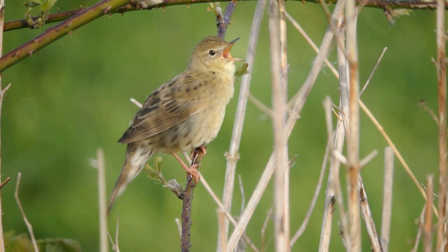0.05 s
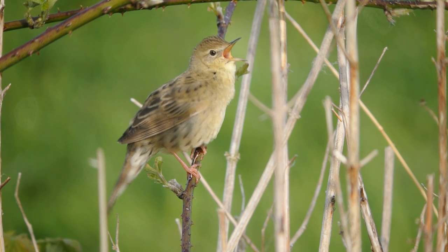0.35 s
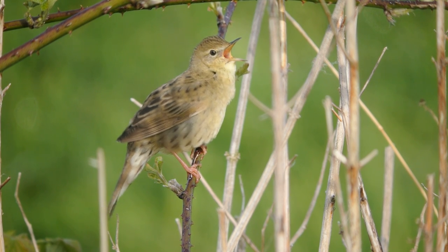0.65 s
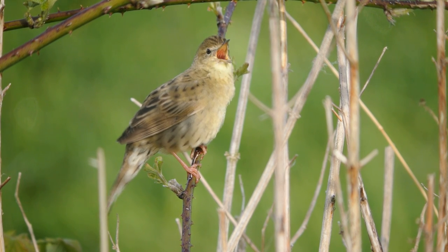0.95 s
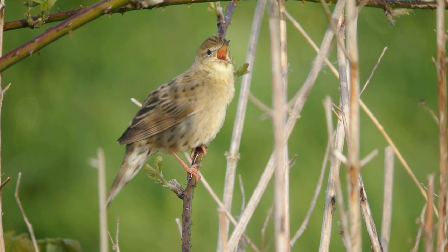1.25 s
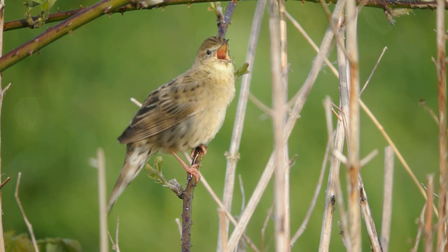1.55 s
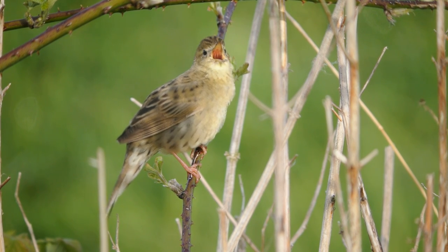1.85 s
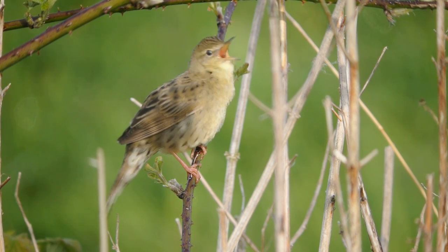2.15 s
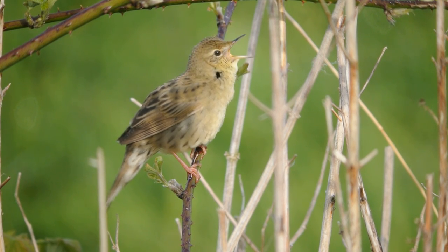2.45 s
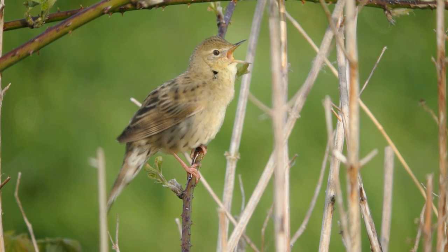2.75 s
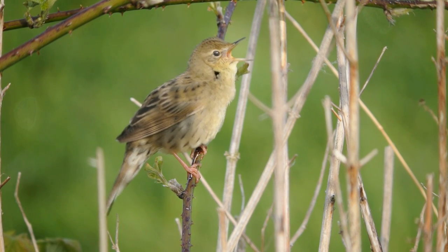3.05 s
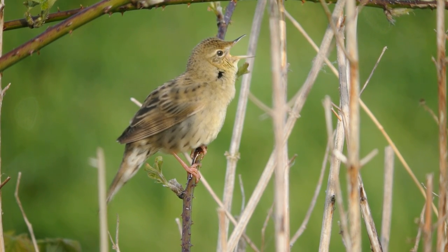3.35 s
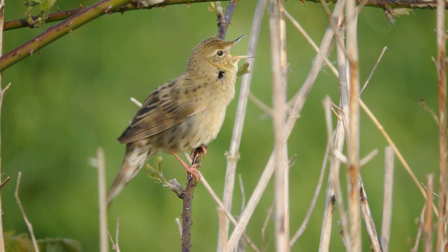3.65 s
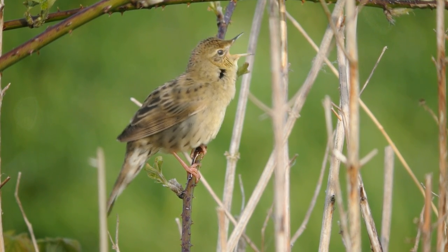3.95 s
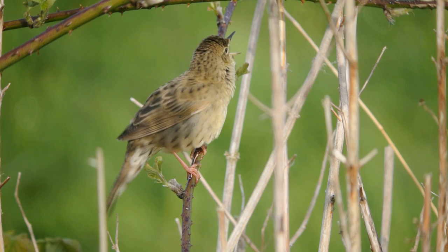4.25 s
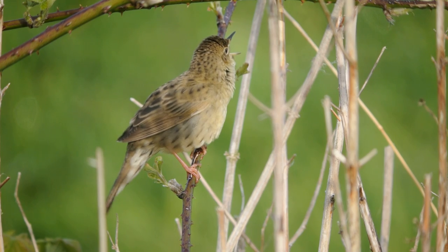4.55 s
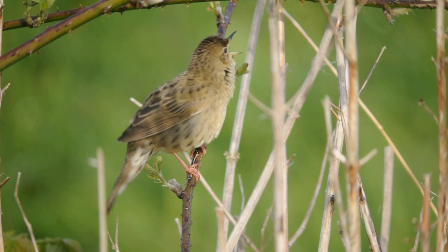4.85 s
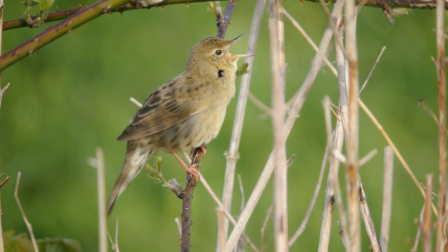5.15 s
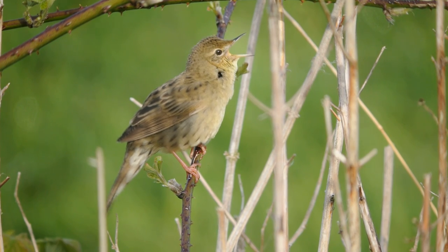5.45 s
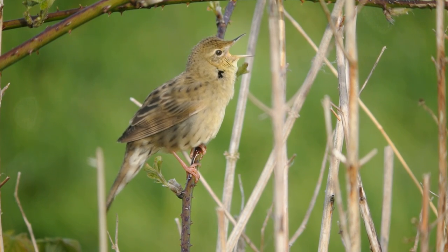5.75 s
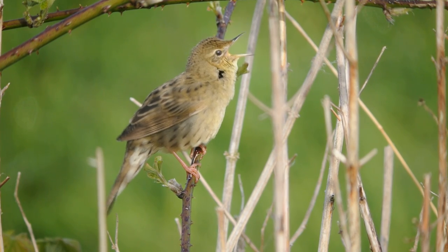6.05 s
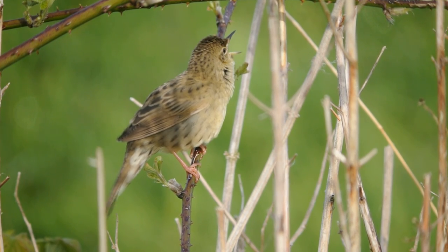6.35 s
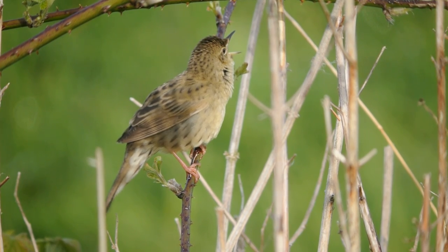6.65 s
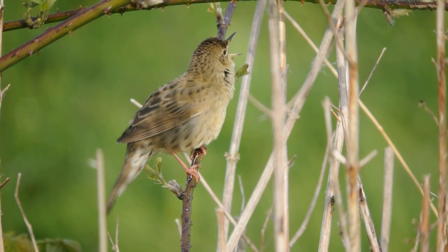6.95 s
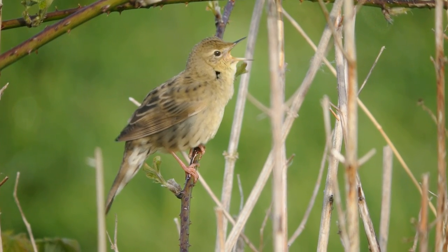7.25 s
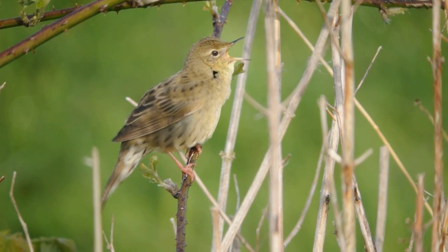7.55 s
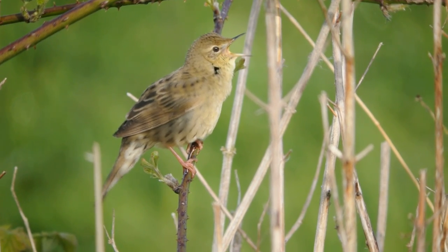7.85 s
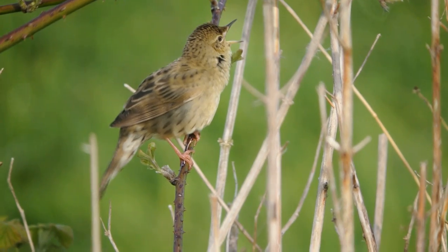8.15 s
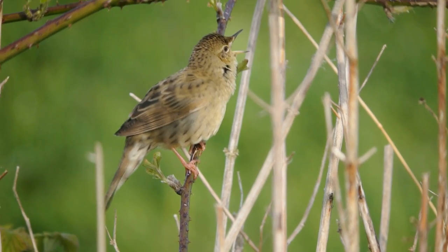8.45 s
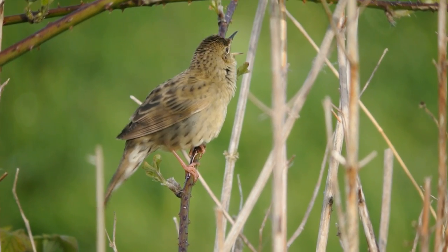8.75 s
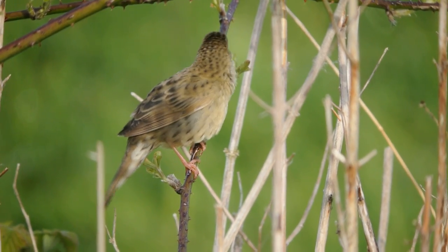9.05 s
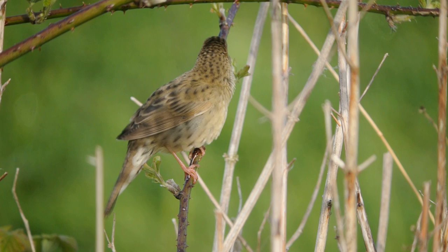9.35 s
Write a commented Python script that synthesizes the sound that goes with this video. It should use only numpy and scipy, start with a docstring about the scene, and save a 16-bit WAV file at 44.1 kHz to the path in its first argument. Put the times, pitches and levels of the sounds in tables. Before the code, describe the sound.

A warbler's fast, unbroken ticking trill rings out outdoors over a faint reed rustle, soft wind and occasional crackles of dry stems.

```python
"""A warbler reels in a reed bed: about 26 times a second a sharp upswept tick, then a short lower note.
Each is a gliding whistle with a weak octave; the song is beamed, so it fades as the head turns away,
and the stems scatter it. Dry stems rasp by friction and snap free, soft bumps sound close by and other
birds call far off. Eddies of wind buffet the left microphone port over a rustle and a distant rumble."""
import sys
import numpy as np
from scipy import signal
from scipy.fft import rfft, irfft, next_fast_len
from scipy.io import wavfile
from scipy.ndimage import map_coordinates

SR = 44100
rng = np.random.default_rng(int(sys.argv[2]) if len(sys.argv) > 2 else 0)


def pcm_store(signal):
    """Save signal as 16-bit PCM."""
    levels = np.round(np.clip(np.atleast_2d(signal), -1, 1) * 32767)
    wavfile.write(sys.argv[1], SR, levels.astype(np.int16).T)


N = 418509

# How the song carries as the head moves. Each row: time in seconds, relative level in dB.
SONG_LEVEL = [(0, -12.5), (1.2, -10.5), (1.85, -12), (2.3, -12.5), (3.05, -12.5), (3.6, -14.5), (4.35, -16),
              (4.85, -15.5), (5.1, -12.5), (5.25, -14), (5.5, -13.5), (5.75, -15.5), (5.92, -17.5),
              (6.2, -19.5), (6.4, -17.5), (7.2, -16.5), (7.35, -13.5), (7.85, -13.5), (8.03, -11.5),
              (8.14, -14), (9, -15), (9.15, -12), (9.49, -13)]
# The spectrum of low buffeting. Each row: frequency in Hz, relative level in dB.
BUFFET_SPECTRUM = [(20, -38), (60, -30), (130, 0.5), (230, 2), (330, -4), (500, -13.5), (700, -30),
                   (1000, -40), (1600, -110)]


def amp(db):
    """Decibels to amplitude ratio."""
    return np.exp(np.asarray(db) * (np.log(10) / 20))


def unit(x):
    """Normalisation to rms 1."""
    return x / np.sqrt(np.mean(x ** 2) + 1e-20)


def along(points, hz):
    """Interpolation of (Hz, value) points on a logarithmic frequency axis."""
    freqs, values = np.transpose(points)
    return np.interp(np.log(hz + 1), np.log(freqs + 1), values)


def read(rows, at):
    """Linear interpolation of each later column at given values of the first."""
    first, *columns = np.transpose(rows)
    return [np.interp(at, first, column) for column in columns]


def wobble(rate):
    """Smooth random modulation: a spline through rate knots a second."""
    knots = rng.standard_normal(int(N * rate / SR) + 4)
    fine = np.arange(0, len(knots) - 1, 1 / 4)
    return np.interp(np.arange(N) * (rate / SR), fine, map_coordinates(knots, [fine]))


def phase_of(hz):
    """Phase is the time integral of frequency."""
    return np.float32(2 * np.pi * (np.cumsum(hz / SR) % 1))


def filtered(x, response):
    """Filtering multiplies the spectrum by a frequency response."""
    size = next_fast_len(N + SR // 10, True)
    gain = np.float32(response(np.fft.rfftfreq(size, 1 / SR)))
    return irfft(rfft(np.float32(x), size) * gain, size)[..., :N]


def incoherent_noise(spectrum):
    """Coloured noise of rms 1, uncorrelated between the ears."""
    return unit(filtered(rng.standard_normal((2, N)), lambda hz: amp(along(spectrum, hz))))


def diffuse_noise(spectrum):
    """A diffuse field of rms 1: long waves reach both ears more alike than short ones."""
    # Each row: frequency in Hz, left-right correlation.
    coherence = [(60, 0.94), (500, 0.71), (1000, 0.74), (2500, 0.09), (8000, 0.11), (15000, 0.14)]

    def response(hz):
        angle = np.arccos(np.clip(along(coherence, hz), -1, 1)) / 2
        return amp(along(spectrum, hz)) * [np.cos(angle), np.sin(angle)]

    mid, side = filtered(rng.standard_normal((2, N)), response)
    return unit(np.array([mid + side, mid - side]))


def scatter(x, t60):
    """Multiple scattering in vegetation gives each ear its own exponentially decaying tail."""
    t = np.arange(SR // 5) / SR
    tail = rng.standard_normal((2, len(t))) * amp(-60 * t / t60) * (1 - np.exp(-t / 0.0016))
    tail /= np.linalg.norm(tail, axis=1, keepdims=True)
    return signal.oaconvolve(np.float32(x)[None], np.float32(tail), axes=1)[:, :N]


def swaying(x, t60):
    """Time-varying scattering: moving stems trade one set of paths for another."""
    sway = np.float32(5 * np.arange(N) / SR)
    return scatter(x * np.cos(sway), t60) + scatter(x * np.sin(sway), t60)


def hiss():
    """Self-noise of the microphone: faint, high and steady."""
    # Each row: frequency in Hz, relative level in dB.
    hiss_spectrum = [(3000, -30), (9000, -14), (13000, 27), (15500, -4)]
    return amp(-61) * incoherent_noise(hiss_spectrum)


def outdoors(distance_db=-48, drone_db=-62):
    """Ambient noise: a far rumble and drone, and a rustle of reeds modulated by the breeze."""
    # The strength of the rustle. Each row: time in seconds, level in dB.
    breeze = [(0, -44.5), (.17, -42.5), (.35, -50.5), (3, -50), (4.2, -46), (5.15, -42), (5.9, -48.5),
              (7.5, -45.5), (8.2, -49), (9.49, -48)]
    # Each row of both spectra: frequency in Hz, relative level in dB.
    reed_spectrum = [(300, -14), (800, 2), (1400, -1), (2600, -4.5), (5000, 1), (10000, -5.5), (15500, -14)]
    far_spectrum = [(20, -16), (45, -1.5), (70, 4.5), (115, -2.5), (200, -1.5), (400, -3), (850, -1.5),
                    (1300, -7.5), (2000, -10.5), (4000, -8), (8000, -15.5), (12000, -13), (15500, -20.5)]
    breeze_db, = read(breeze, np.arange(N) / SR)
    rustle = unit(diffuse_noise(reed_spectrum) * amp(1.38 * wobble(25) + 3.26 * wobble(600)))
    drone = amp(drone_db + 0.58 * wobble(1.9)) * np.sin(phase_of(113 + 3 * wobble(5.0)))
    rumble = amp(distance_db + 1.27 * wobble(2.96)) * diffuse_noise(far_spectrum)
    return rumble + amp(breeze_db) * rustle + drone


def far_hum(start_s=8, rise_s=0.4, hum_hz=619, hum_db=-66, waver=0.0121, flutter_db=3):
    """A faint distant tone drifts in, randomly modulated in amplitude and frequency."""
    swell = np.clip((np.arange(N) / SR - start_s) / rise_s, 0, 1)
    envelope = amp(hum_db + flutter_db * wobble(13)) * swell
    return envelope * np.sin(phase_of(hum_hz * (1 + waver * wobble(40))))


def far_birds(gain_db=-1.5, waver=0.016, arch=0.034, flutter_db=3, echo_db=-3):
    """Thin arched whistles flutter, smeared by scattering on their long path."""
    # Each row: start and length in seconds, nominal first and last pitch in Hz, relative level in dB.
    whistles = [(0.603, .06, 3070, 2870, -51), (0.68, 0.055, 2450, 2950, -52),
                (0.892, .06, 3340, 3310, -59), (1.042, 0.047, 3050, 2520, -51),
                (1.125, .055, 3100, 2520, -49), (1.453, 0.038, 2900, 3020, -50),
                (1.55, .052, 3060, 2520, -47), (1.68, .07, 1900, 1980, -61),
                (3.985, 0.052, 3870, 3680, -45.5), (4.914, 0.069, 3670, 3800, -47),
                (5.863, .075, 4150, 4340, -49), (5.94, 0.089, 2040, 1900, -49),
                (6.121, 0.078, 1610, 1566, -56), (6.27, 0.11, 2030, 1860, -55),
                (6.502, 0.099, 2700, 2150, -51.5), (6.49, .06, 4270, 4180, -48),
                (7.085, 0.064, 4100, 4400, -47), (7.7, .07, 3550, 3850, -48), (7.99, .06, 4700, 4490, -45)]
    calls = np.zeros(N)
    bend = 1 + waver * wobble(260)
    for start, length, start_hz, end_hz, db in whistles:
        on = round(start * SR) + np.arange(round(length * SR))
        progress = np.linspace(0, 1, len(on))
        swell = np.sin(np.pi * progress)
        hz = (start_hz + (end_hz - start_hz) * progress) * bend[on] * (1 + arch * (swell - .5))
        calls[on] += amp(db) * swell * np.sin(phase_of(hz))
    calls *= unit(amp(flutter_db * wobble(120)))
    return amp(gain_db) * (calls + amp(echo_db) * scatter(calls, t60=0.16))


def wind(gain_db=-1, thud_db=-5, shelter_db=-18, lumps_db=4.0, steepness=1.52, big_eddy_s=0.043):
    """Turbulent pressure on the left port: strong puffs are brighter, long ones deeper."""
    # Each row: centre in seconds, relative level in dB, half width in seconds.
    puffs = [(1.17, -56, 0.09), (1.52, -41.5, 0.061), (2.18, -40, 0.033), (2.358, -28, 0.0074),
             (2.411, -24, 0.0071), (2.462, -31.5, 0.015), (2.41, -40.5, 0.062), (2.77, -35, 0.027),
             (3.225, -28, 0.014), (3.285, -26.5, 0.016), (3.336, -34, 0.016), (3.26, -34, 0.074),
             (3.46, -33, 0.016), (3.549, -25, 0.01), (3.587, -25.5, 0.0053), (3.651, -23.5, 0.0032),
             (3.673, -27.5, 0.0047), (3.695, -23, 0.0048), (3.745, -32, 0.01), (3.8, -31, 0.0069),
             (3.888, -23.5, 0.0075), (3.72, -44.5, 0.1), (4.58, -46, 0.049)]
    # Slow eddies. Each row: frequency in Hz, relative level in dB.
    thud_spectrum = [(15, -20), (35, -5.5), (80, 2), (150, -0.5), (300, -21), (700, -58), (2000, -90)]
    t, force, bulk = np.arange(N) / SR, np.zeros(N), np.zeros(N)
    for centre, db, width in puffs:
        on = np.abs(t - centre) < 1
        offset = (t[on] - centre) / width
        skirt = amp(-21) * np.exp(-(offset / 3.8) ** 2 / 2)  # weaker eddies lead and trail
        puff = amp(db) * (np.exp(-offset ** 2 / 2) + skirt)
        force[on] += puff
        bulk[on] += puff * width / big_eddy_s
    peak = force.max()
    buffet = (force / peak) ** steepness * incoherent_noise(BUFFET_SPECTRUM)
    thud = amp(thud_db) * (bulk / peak) ** 0.85 * incoherent_noise(thud_spectrum)
    lumps = unit(amp(lumps_db * wobble(90)))
    exposure = amp([[0], [shelter_db]])  # the right port lies in shelter
    return amp(gain_db) * peak * (buffet + thud) * lumps * exposure


def bumps(thud_db=-3):
    """Damped resonance: soft knocks close by ring briefly over a little low noise."""
    # Each row: start in seconds, relative level in dB, resonance in Hz, 60 dB decay time in seconds.
    knocks = [(6.98, -47, 313, 0.14), (7.03, -46, 260, .1), (7.194, -42.5, 330, 0.053),
              (8.766, -45, 290, .07), (8.806, -38.5, 298, .07)]
    t, ring, push = np.arange(SR // 5) / SR, np.zeros(N), np.zeros(N)
    for start, db, hz, t60 in knocks:
        blow = amp(db - 60 * t / t60) * (1 - np.exp(-t / .002))
        ring[round(start * SR):][:len(t)] += blow * np.sin(2 * np.pi * hz * t)
        push[round(start * SR):][:len(t)] += blow
    return ring + amp(thud_db) * push * diffuse_noise(BUFFET_SPECTRUM)


def rasps(gain_db=-6.5, grain_db=2.5, crackle_db=1.0, echo_db=-15, t60=0.11, edge_s=0.011):
    """Stick-slip friction: dry stems drag, crackle and snap free, a hollow body under a fizz."""
    # Each row: start and length in seconds, relative level in dB, fizz against body in dB.
    scrapes = [(0.091, 0.02, -36.5, 12), (.138, 0.022, -33, 5), (1.843, 0.131, -29, -14),
               (6.8, 0.1, -42, -25)]
    # Each row: start in seconds, relative level in dB, fizz against body in dB, length in seconds.
    snaps = [(1.852, -23, -19, 0.0073), (1.86, -24, -23, .006), (1.871, -13.5, -14, 0.0065),
             (1.894, -14.5, -12, 0.0065), (1.939, -22, -15, .006), (1.943, -22, -6, 0.007),
             (1.964, -35, -7, .006), (4.49, -28, -22, 0.0045), (5.984, -27.5, -20, .006),
             (6.809, -17.5, -27, 0.0088), (6.843, -19.5, -12, 0.0083), (6.866, -18, -7, 0.0066),
             (6.8945, -22, -18, 0.0067), (6.897, -18.5, -7, 0.0081), (7.194, -12.5, -8, 0.0023),
             (7.333, -16.5, -12, 0.0018), (8.11, -26, -13, 0.0047)]
    # Each row of both spectra: frequency in Hz, relative level in dB.
    body_spectrum = [(200, -19), (600, -9.5), (1100, -5.5), (1550, -1), (2150, -2.5), (2750, 6), (3150, 3),
                     (3600, -1), (4400, -6), (8000, -8), (16000, -24)]
    fizz_spectrum = [(2000, -18), (5000, 10), (8000, -1), (13000, 0), (16000, -2)]
    t, body, fizz = np.arange(SR // 5) / SR, np.zeros(N), np.zeros(N)
    for start, length, db, fizz_db in scrapes:
        crackle = unit(amp(crackle_db * wobble(447)))[:len(t)]
        drag = amp(db) * np.clip(np.minimum(t, length - t) / edge_s, 0, 1) * crackle
        body[round(start * SR):][:len(t)] += drag
        fizz[round(start * SR):][:len(t)] += drag * amp(fizz_db)
    for start, db, fizz_db, length in snaps:
        crack = amp(db) * (1 - np.exp(-t / 0.00073)) * np.exp(-2 * t / length)
        body[round(start * SR):][:len(t)] += crack
        fizz[round(start * SR):][:len(t)] += crack * amp(fizz_db)
    grain = amp(gain_db) * unit(amp(grain_db * wobble(1200)))
    direct = grain * (body * diffuse_noise(body_spectrum) + fizz * diffuse_noise(fizz_spectrum))
    return direct + amp(echo_db) * scatter(direct.mean(0), t60)


def reed_bed(song, scatter_db=-12, t60=0.33, twigs_db=-8, twigs_t60=0.018):
    """Reflection and scattering: stems echo and blur the song whichever way the beak points."""
    # Nearby stems and ground. Each row: delay in milliseconds, left and right gain in dB.
    reflections = [(2.65, -15.5, -16.5), (4.4, -25, -23), (6.4, -20, -20), (8.6, -18.5, -23),
                   (11.1, -20.5, -17)]
    # Thin twigs scatter mainly the octave. Each row: frequency in Hz, relative gain in dB.
    twig_response = [(4000, -9), (7500, 2.5), (9300, 9), (11000, 3.5), (12100, -13), (13500, 9.5),
                     (16000, 16)]
    mono = song.mean(0)
    song_db, = read(SONG_LEVEL, np.arange(N) / SR)
    spread = mono * amp(song_db.mean() - song_db)  # the song without the fades of the turning head
    echoes = sum(amp([[left], [right]]) * np.pad(spread, (round(ms / 1000 * SR), 0))[:N]
                 for ms, left, right in reflections)
    blur = swaying(spread, t60) * amp([[-1], [1]])
    twigs = swaying(filtered(mono, lambda hz: amp(along(twig_response, hz))), twigs_t60)
    return echoes + amp(scatter_db) * blur + amp(twigs_db) * twigs


def syrinx(shape, ms, pitch, overtone_db, rough_db, tilt_db=0):
    """Source and filter: a gliding, slightly airy whistle whose weak octave is shaped by the beak."""
    # Each row: frequency in Hz, relative gain of the octave in dB.
    beak_response = [(9000, 24), (11000, 0.5), (12100, -4), (13500, 5.5), (14400, 4)]
    envelope, glide = read(shape, ms)
    sounding = (ms > shape[0][0]) & (ms < shape[-1][0])
    octaves = np.log2(glide / read(shape, 0)[1])
    envelope = envelope * sounding * amp(tilt_db * octaves)  # a positive tilt weakens the low end
    phase = phase_of(glide * pitch)
    air = signal.lfilter(*signal.butter(2, [3800, 10000], "band", fs=SR), rng.standard_normal(N))
    overtone = amp(overtone_db + along(beak_response, 2 * glide * pitch)) * np.sin(2 * phase)
    return envelope * (np.sin(phase) + amp(rough_db) * unit(air) + overtone)


def warbler(pairs_per_s=25.7185, first_s=.0267, note_db=-2, note_delay_ms=11.55, click_db=-20,
            tick_pan_db=-1, note_pan_db=-6.5):
    """A pulse train from a directional source: tick and note alternate as the bird turns its head."""
    # Each row: milliseconds from the tick's middle, relative amplitude, nominal pitch in Hz.
    tick_shape = [(-1.22, 0.012, 4400), (-0.7738, 0.34, 5200), (-0.3457, 0.84, 6000), (0, 1.075, 6480),
                  (0.74, 0.37, 7150), (1.15, 0.05, 6900), (1.72, 0.21, 6300), (3, 0.12, 6700)]
    # Each row: milliseconds from the note's start, relative amplitude, pitch ratio.
    note_shape = [(0, 0.012, .97), (.3, 0.52, 1.015), (.8, 1, 1.016), (1.8, 0.86, .992), (3, 0.83, .993),
                  (3.8, 0.49, .986), (4.5, 0.046, .965)]
    # Each row: time in seconds, lag behind a steady pace in milliseconds.
    drift = [(0, -0.2), (1.3, 1.7), (2.4, -0.58), (3.7, -0.5), (4.55, -1.5), (4.7, -2), (5.1, -2),
             (5.4, -0.7), (5.9, -1.5), (6.5, 3), (6.9, 2), (7.35, 0.5), (7.55, 1.3), (8.05, 1),
             (8.3, -0.85), (9.49, 0.2)]
    # The octave is beamed more narrowly. Each row: time in seconds, its relative gain in dB.
    facing = [(0, -7.5), (1.2, -5.5), (3, -6.5), (4.2, -7.5), (5.1, -8.5), (5.7, -6), (6.3, -9),
              (7.6, -8.5), (9.49, -18)]
    # Head turns. Each row: time in seconds, the note's swing in dB of left over right.
    turns = [(0, 1.5), (4.3, 0.5), (4.55, 0.8), (5.45, 5), (5.65, 7), (6.3, -0.5), (7.6, -0.5), (7.85, -2),
             (9.49, -0.5)]
    # Each row: time in seconds, tick tilt in dB per octave, note sag in dB per millisecond,
    # nominal note pitch in Hz, note stress in dB.
    delivery = [(0, 6, 0.6, 5500, -.8), (1.8, 1, 0.45, 5495, 0.1), (2.6, 6, -0.1, 5495, -1.2),
                (3.45, 8, 1.5, 5510, -0.3), (4.05, 5, 1, 5510, 0), (4.2, 3, 0, 5460, -1.5),
                (4.65, -4, .1, 5435, -0.3), (5.2, 10, 0.3, 5545, -1.3), (5.65, 12, 0.5, 5485, 2),
                (5.95, 9, 0.4, 5460, -1.2), (6.3, 2, 0.1, 5480, -0.5), (6.85, 10, 0.8, 5460, 1),
                (7.35, 7, 1.1, 5470, -0.5), (8.05, 2, 1, 5535, 0), (8.6, 0, .5, 5470, -.5),
                (9.1, 4, .1, 5470, -1.2), (9.4, 3, 0.1, 5440, -2)]
    # Single notes slip off pitch. Each row: time in seconds, shift in Hz.
    slips = [(1.582, 211), (2.671, 110), (4.149, -110), (6.171, 129), (6.832, 110.5)]
    t = np.arange(N) / SR
    steady = np.arange(first_s, N / SR, 1 / pairs_per_s)
    beats = steady + read(drift, steady)[0] / 1000
    pair = np.clip(np.searchsorted(beats, t + 1 / 150) - 1, 0, len(beats) - 1)  # each sample's beat
    chance = rng.standard_normal((9, len(beats)))  # no two pairs are quite alike
    ms = (t - beats[pair]) * 1000 + 0.1196 * chance[0][pair]
    song_db, swing_db = read(SONG_LEVEL, beats)[0], read(turns, beats)[0]
    facing_db = read(facing, beats)[0][pair]
    tilt_db, sag_db, pitch_hz, stress_db = read(delivery, beats)
    for when, shift_hz in slips:
        pitch_hz[np.argmin(np.abs(beats - when))] += shift_hz

    tick = syrinx(tick_shape, ms, (1 + .0065 * chance[1])[pair], overtone_db=-20.5 + facing_db,
                  rough_db=-24.5, tilt_db=(tilt_db + 2.5 * chance[8])[pair])
    note_ms = (ms - note_delay_ms + 0.267 * chance[2][pair]) * np.exp(0.062 * chance[3])[pair]
    note_hz = (pitch_hz * (1 + .0045 * chance[4]))[pair]
    note = syrinx(note_shape, note_ms, note_hz, overtone_db=-23 + facing_db, rough_db=-30.5)
    note *= amp(-sag_db[pair] * np.clip(note_ms, 0, note_shape[-1][0]))
    click_envelope = np.maximum(1 - np.abs(ms + 5.05) / 0.66, 0)  # just ahead of each tick
    click = click_envelope * np.sin(phase_of(np.full(N, 6200))) * amp(click_db + 2 * chance[5])[pair]

    sides = np.array([[1], [-1]]) / 2
    tick_pan = sides * (tick_pan_db - 0.5 * swing_db)  # the tick swings against the note
    note_pan = sides * (note_pan_db + swing_db)
    tick_gain = amp(song_db + .5 * chance[6] + tick_pan)
    note_gain = amp(song_db + note_db + stress_db + 0.95 * chance[7] + note_pan)
    return (tick + click) * tick_gain[:, pair] + note * note_gain[:, pair]


def scene():
    """Superposition: the singer close by, everything else behind it."""
    song = warbler()
    foreground = song + reed_bed(song) + rasps() + bumps()
    return foreground + far_birds() + far_hum() + wind() + outdoors() + hiss()


def record(dry):
    """Band limiting: nothing above 16 kHz passes."""
    return filtered(dry, lambda hz: hz < 16000)


dry = scene()
out = record(dry)
pcm_store(out)
```